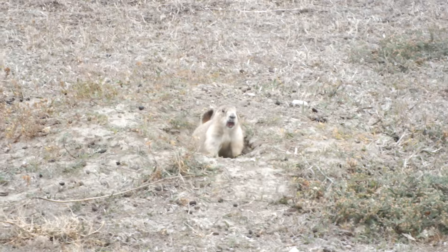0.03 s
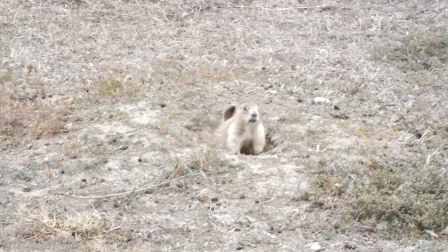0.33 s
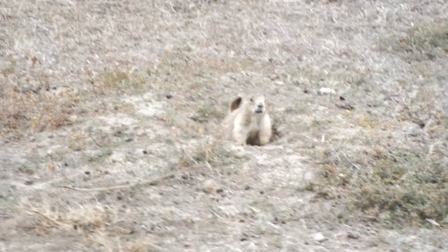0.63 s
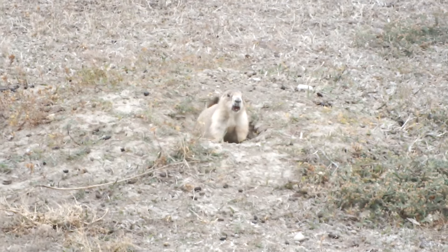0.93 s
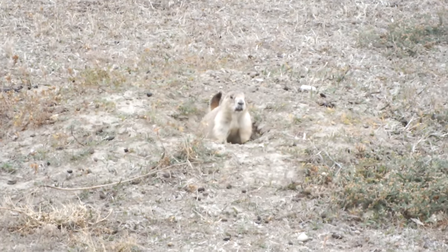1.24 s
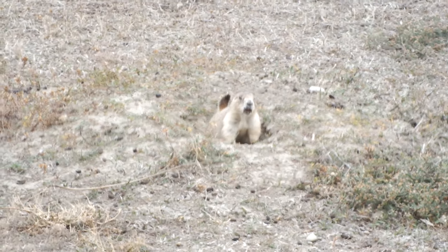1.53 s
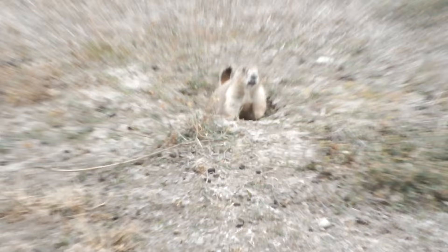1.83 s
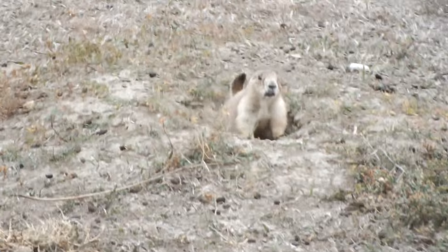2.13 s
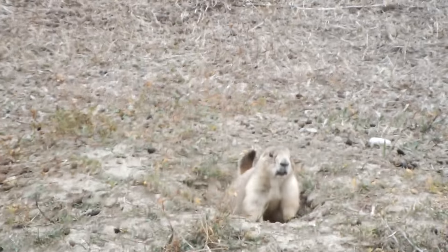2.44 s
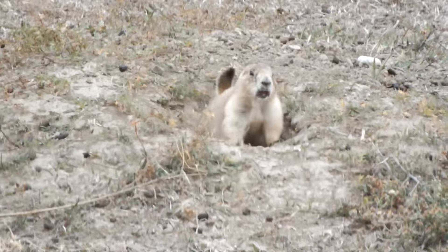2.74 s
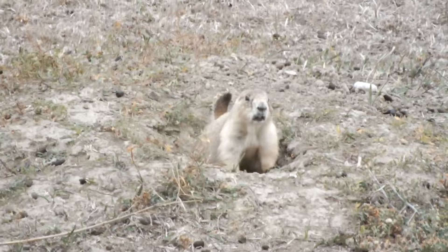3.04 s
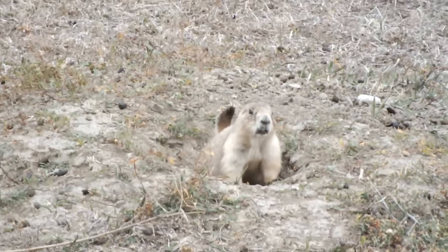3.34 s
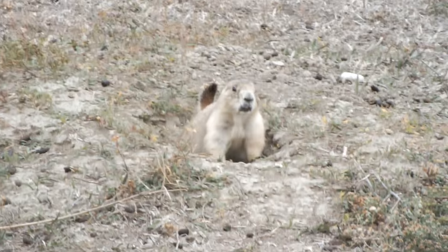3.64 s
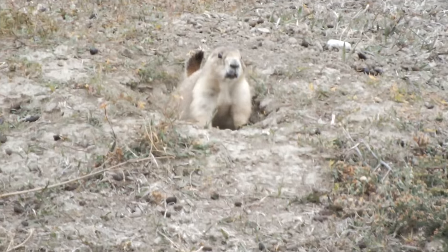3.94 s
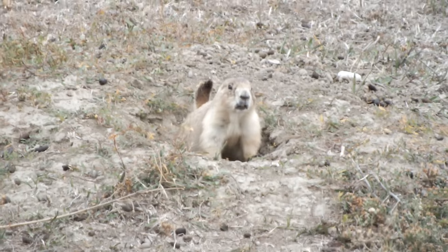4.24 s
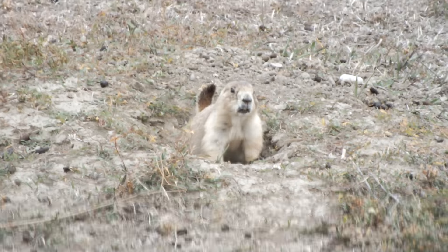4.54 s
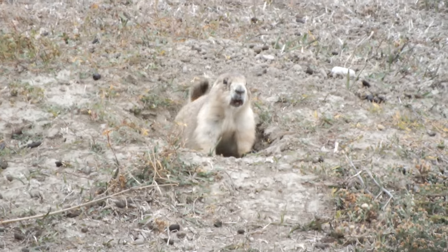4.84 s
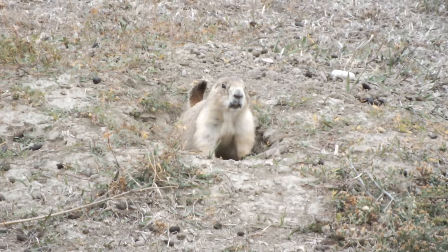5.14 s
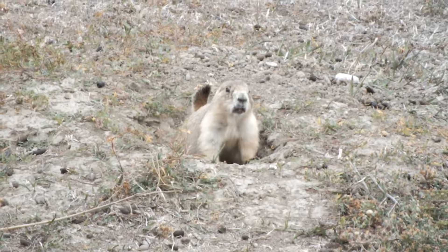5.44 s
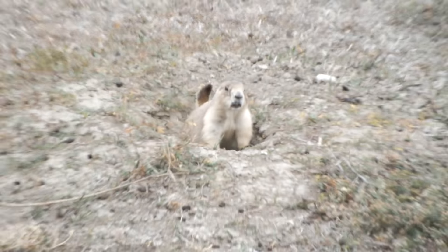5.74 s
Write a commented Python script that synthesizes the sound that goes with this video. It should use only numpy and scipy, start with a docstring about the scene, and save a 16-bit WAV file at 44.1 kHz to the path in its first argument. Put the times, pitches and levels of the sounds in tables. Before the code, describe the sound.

Light wind blows steadily over open grassland, with a faint low hum and a thin trace of insects. A prairie dog a few metres away barks seven times, at about 0.1, 1.0, 1.6, 2.8, 4.1, 4.9 and 5.6 seconds. Each bark is a very short, high squeak that rises and falls in pitch, with a raspy edge and almost no echo. The second is the harshest and cracks into a squeal. Throughout, distant prairie dogs give much quieter, higher yips, mostly from the left. Two tiny, thin whistles sound on the left at about 2.2 and 3.9 seconds. The hand-held camera adds soft rubs and small ticks, mostly between 1.4 and 3.6 seconds, and dull bumps near 1.9, 4.8 and 5.7 seconds. Just after that last bump, its plastic case gives one sharp, close click.

```python
"""A prairie dog barks seven times from its burrow on open ground, a few metres from a hand-held camera.
Each bark is one short arch of pitch from the vocal folds that breaks into a rasp and may drop at its crest.
Neighbours yip far off, over light wind in the grass, a low hum and insects.
The hand bumps and rubs the camera and makes it tick, two thin whistles sound briefly,
and near the end the plastic case gives one sharp click."""
import sys
import numpy as np
from scipy import signal
from scipy.fft import rfft, irfft, next_fast_len
from scipy.io import wavfile
from scipy.ndimage import uniform_filter1d

SR = 44100
rng = np.random.default_rng(int(sys.argv[2]) if len(sys.argv) > 2 else 0)


def store_pcm(level_fs):
    """Save levels as 16-bit WAV."""
    pcm = np.round(np.clip(level_fs, -1, 1) * 32767).astype(np.int16)
    wavfile.write(sys.argv[1], SR, np.atleast_2d(pcm).T)


N = 259308


def amp(db):
    """Decibels to gain."""
    return 10 ** (np.asarray(db) / 20)


def unit(x):
    """Scales to rms 1."""
    return x / np.sqrt(np.mean(x ** 2) + 1e-20)


def curve(points, hz):
    """Reads a table on a log-frequency axis."""
    freqs, values = np.transpose(points)
    return np.interp(np.log(hz + 1), np.log(freqs + 1), values)


def add(mix, start_s, sound):
    """Lays a sound into the mix."""
    part = mix[..., round(start_s * SR):][..., :sound.shape[-1]]
    part += sound[..., :part.shape[-1]]


def colour(x, gain):
    """EQ by a gain that is a function of frequency."""
    size = next_fast_len(x.shape[-1] + 1024)
    return irfft(rfft(x, size) * gain(np.fft.rfftfreq(size, 1 / SR)), size)[..., :x.shape[-1]]


def wobble(size, hz):
    """Smooth random modulation of rms 1, up to about the given rate."""
    return unit(colour(rng.standard_normal(size), lambda f: np.exp(-.5 * (f / hz) ** 2)))


def stereo(a, b, likeness):
    """Two channels of a given likeness from two unrelated noises."""
    return np.array([a, likeness * a + np.sqrt(1 - likeness ** 2) * b])


def ports(x, balance_db, phase_rad):
    """The camera body shades and delays a sound at its two microphone ports."""
    sides = np.array([[1], [-1]])
    return colour(np.atleast_2d(x), lambda f: (amp(balance_db(f) / 2) * np.exp(.5j * phase_rad(f))) ** sides)


# tone of wind over grass: freq_hz, relative_db
WIND_TONE = [(15, -43), (25, -19), (70, -6), (92, -6), (114, -1.5), (145, -12), (354, -2.5), (476, -6),
             (840, -6), (1520, -14.5), (6050, -25.5), (6560, -29.5), (7110, -27.5), (14400, -40),
             (16000, -48)]
# swells of the breeze, each level taken against its median: time_s, roar_db, hiss_db
WIND_SWELLS = [(0.26, -47.5, -60.5), (0.49, -47, -59), (0.87, -46, -61.5), (2.78, -46.5, -57),
               (2.89, -47.5, -59), (5.16, -47.5, -59.5), (5.88, -46, -58.5)]
# stereo width of the wind: freq_hz, likeness_0_to_1
WIND_LIKENESS = [(25, .7), (60, 0.79), (130, 0.82), (290, 0.81), (640, 0.64), (1100, 0.5), (1400, 0.18),
                 (3000, 0.15), (7000, 0.21), (12000, 0.089)]
# wind balance at the ports: freq_hz, left_minus_right_db
WIND_BALANCE = [(25, 2.2), (110, 1.6), (400, 1.2), (950, -2), (1400, -1.5), (2200, 4.5), (3300, 3.5),
                (4800, .8), (7200, 2.5), (12000, 0.5), (15000, -1)]
# wind phase at the ports: freq_hz, left_lead_rad
WIND_PHASE = [(700, 0), (1200, 1.17), (1700, 3), (4000, 6), (7000, 9), (8500, 8.5), (10000, 12.5)]

def wind(level_db=-45.3, patchy_db=1.32, crossover_hz=2000):
    """Wind over the grass: a bed of low roar and hiss that swells slowly, with drifting patches."""
    window, hop = 1024, 256
    t = np.arange(N // hop + 5) * hop / SR
    hz = np.fft.rfftfreq(window, 1 / SR)
    a, b, c, d, patches = rng.standard_normal((5, len(t), len(hz)))
    patches = unit(uniform_filter1d(uniform_filter1d(patches, size=14, axis=0), size=10, axis=1))
    time_s, *swells = np.transpose(WIND_SWELLS)
    roar_db, hiss_db = (np.interp(t, time_s, db - np.median(db))[:, None] for db in swells)
    treble = hz ** 2 / (hz ** 2 + crossover_hz ** 2)
    shape_db = curve(WIND_TONE, hz) + (1 - treble) * roar_db + treble * hiss_db + patchy_db * patches
    spectra = stereo(a + 1j * b, c + 1j * d, curve(WIND_LIKENESS, hz)) * amp(shape_db)
    air = signal.istft(spectra.transpose(0, 2, 1), nperseg=window, noverlap=window - hop)[1][:, :N]
    air = ports(unit(air), lambda f: curve(WIND_BALANCE, f), lambda f: curve(WIND_PHASE, f))
    return amp(level_db) * air


# tones of the low hum: pitch_hz, level_db
HUM_TONES = [(65, -59), (122, -59)]

def hum(waver_rad=.49, waver_hz=3):
    """Two low sines waver slightly, a touch to the left."""
    out, t = np.zeros((2, N)), np.arange(N) / SR
    for hz, db in HUM_TONES:
        drift = waver_rad * hz / HUM_TONES[0][0] * wobble(N, waver_hz)
        out += amp([[db + 1], [db - 1]]) * unit(np.sin(2 * np.pi * hz * t + drift))
    return out


# a low drone, insects in the grass and a thin hiss:
# centre_hz, width_hz, level_db, likeness_0_to_1, flutter_db, left_minus_right_db
DRONE_BANDS = [(233.5, 15, -64.5, 0.8, 1.5, 1), (6584, 480, -68.5, .5, 3.5, -4),
               (14400, 150, -83, .4, 3, -5)]

def drones_and_insects(flutter_hz=5):
    """Narrow bands of noise flutter in level."""
    out = np.zeros((2, N))
    for hz, width_hz, db, likeness, flutter_db, pan_db in DRONE_BANDS:
        band = colour(rng.standard_normal((2, N)), lambda f: 1 / (1 + (2 * (f - hz) / width_hz) ** 2))
        flutter = amp(flutter_db * wobble(N, flutter_hz))
        out += amp([[db + pan_db / 2], [db - pan_db / 2]]) * unit(stereo(*band, likeness) * flutter)
    return out


def resonate(x, gain):
    """Filters like a resonant tube: minimum phase, so every pulse rings on afterwards."""
    size = next_fast_len(len(x) + 2048)
    log_gain = np.log(np.maximum(gain(abs(np.fft.fftfreq(size, 1 / SR))), 1e-3))
    response = np.exp(signal.hilbert(log_gain).conj())
    return np.fft.ifft(np.fft.fft(x, size) * response).real[:len(x)]


def voice(hz, rough, throat, jitter=.083, shimmer=.25, rasp=1.05, flutter_hz=480, slaps_per_s=180):
    """Vocal folds through the throat; when rough, they stumble, leak puffs of air and slap."""
    size = len(hz)
    phase = 2 * np.pi * np.cumsum(hz * (1 + jitter * rough * wobble(size, flutter_hz))) / SR
    folds = unit(sum(np.cos(k * phase) * (k * hz < SR / 2) for k in range(1, 15)))
    puffs = unit((1 + np.cos(phase)) * rng.standard_normal(size))
    slaps = 7 * (rng.random(size) < slaps_per_s / SR)
    grit = colour(rasp * puffs + slaps, lambda f: 1 / np.hypot(1, (f / 12000) ** 2))
    drive = (folds + rough * grit) / np.hypot(1, rasp * rough)
    drive *= np.exp(shimmer * rough * wobble(size, flutter_hz))
    return unit(resonate(drive, lambda f: amp(curve(throat, f)) * (1 - np.exp(-(f / 800) ** 4))))


def bark_pitch(u, top_hz, crest, drop, climb=.1248, climb_bend=2.2, fall=.219, fall_bend=2.11):
    """As u runs 0 to 1, the pitch climbs to a crest, may break to a lower register, and falls away."""
    before = np.maximum(1 - u / crest, 0)
    after = np.maximum((u - crest) / (1 - crest), 0)
    sag = climb * before ** climb_bend + drop * (u > crest) + (fall - drop) * after ** fall_bend
    return top_hz * (1 - uniform_filter1d(sag, size=100, mode="nearest"))


# bark cues: start_s, length_s, level_db, top_pitch_hz, crest_at_fraction, pitch_drop_fraction,
# rasp_delay_s, rasp_length_s, added_roughness_0_to_1
BARK_CUES = [ (0.1182, .046, -27.5, 1250, .38, 0.01, .010, .020, .06),
             (.991, .054, -26, 1299, 0.47, 0.11, 0.0087, 0.037, 0.59),
             (1.631, .052, -27, 1245, .36, 0.01, .014, 0.029, 0.3),
             (2.8489, 0.05, -27, 1252, 0.43, 0, 0.0069, 0.033, .55),
             (4.073, 0.052, -27, 1289, .58, .13, 0.0091, .023, .4),
             (4.887, .049, -27.5, 1228, .48, 0, 0.0016, .016, 0.5),
             (5.5595, 0.051, -27, 1236, 0.48, 0, .010, .022, 0.05)]
# air pressure through a bark: length_fraction, gain_db
BARK_ENVELOPE = [(0, -7), (.1, -3), (.3, -2), (.62, -2.5), (.82, -1.5), (1, -14)]
# formants of throat and mouth: freq_hz, gain_db
BARK_THROAT = [(1150, -14.5), (1900, -5.5), (2450, 3), (3100, -10.5), (3700, 4), (4300, -15.5),
               (5100, -10.5), (6900, -2.8), (7700, -21.5), (9000, -16.5), (10600, -28.5), (11900, -19),
               (14600, -34), (16000, -33)]

def barks(base_roughness=.12):
    """The near prairie dog: one push of air makes a clear arch of pitch with a rasping stretch."""
    out = np.zeros(N)
    for start_s, length_s, db, top_hz, crest, drop, rasp_delay_s, rasp_s, roughness in BARK_CUES:
        u = np.linspace(0, 1, round(length_s * SR))
        rasping = (u * length_s > rasp_delay_s) & (u * length_s < rasp_delay_s + rasp_s)
        rough = base_roughness + roughness * uniform_filter1d(rasping * 1., size=130)
        pressure = amp(np.interp(u, *np.transpose(BARK_ENVELOPE))) * signal.windows.tukey(len(u), .05)
        hz = bark_pitch(u, top_hz, crest, drop)
        add(out, start_s, amp(db) * pressure * voice(hz, rough, BARK_THROAT))
    return out


def open_ground(x, mound_db=-19, mound_t60_s=.081, grass_db=-27, grass_t60_s=.97, dull_hz=5500):
    """Reverb without walls: a brief scatter off the mound, then a faint wash from the grass."""
    t = np.arange(SR // 2) / SR
    def scatter(t60_s):
        taps = rng.standard_normal((2, len(t))) * amp(-60 * t / t60_s) * (t > .003)
        return taps / np.linalg.norm(taps[0])
    tail = amp(mound_db) * scatter(mound_t60_s) + amp(grass_db) * scatter(grass_t60_s)
    wet = signal.fftconvolve(x[None], tail, axes=1)[:, :N]
    return colour(wet, lambda f: 1 / np.hypot(1, (f / dull_hz) ** 2))


# bark balance at the ports: freq_hz, left_minus_right_db
BURROW_BALANCE = [(1200, 3.5), (2400, -2), (3700, 1.5), (5400, -4.5), (6600, 4.5), (8600, 4.5), (11500, 7),
                  (15000, -2)]
# bark phase at the ports: freq_hz, left_lead_rad
BURROW_PHASE = [(1200, -0.48), (2400, 0.7), (3700, -0.68), (5400, 0.55), (6300, 1), (8000, 0), (12000, -.4)]

def from_burrow(x):
    """Places the near voice: the direct sound at the two ports, plus scatter off the ground."""
    direct = ports(x, lambda f: curve(BURROW_BALANCE, f), lambda f: curve(BURROW_PHASE, f))
    return direct + open_ground(x)


# distant yip cues: start_s, length_s, top_pitch_hz, level_db, roughness_0_to_1, leftward_0_to_1
YIP_CUES = [(.398, 0.064, 2080, -50.5, .45, 0.36), (0.492, 0.049, 2290, -51, .2, 0.9),
            (1.135, .056, 2400, -46.5, 0.56, 0.89), (2.149, .04, 1940, -58, .8, 0),
            (2.191, 0.051, 2294, -47, .2, 0.94), (2.637, 0.056, 2260, -46.5, .12, 1),
            (3.215, .051, 2275, -49.5, 0.33, 0.98), (3.827, .034, 1835, -49, 0.1, 0.93),
            (4.17, .053, 2294, -45.5, 0.12, 1), (4.226, .04, 1950, -55.5, .9, 0.1),
            (4.628, .048, 2270, -49.5, .06, 0.97), (4.712, 0.049, 1980, -53.5, 0.76, 0.14),
            (5.092, .049, 2240, -51, 0.13, 1), (5.627, .063, 2230, -51.5, .2, 0.78),
            (5.701, .04, 1960, -54, 0.62, 0)]
# pitch bend of a yip: length_fraction, pitch_ratio
YIP_BEND = [(0, .82), (.13, .92), (.25, 1), (.55, .995), (.85, .965), (1, .82)]
# formants of the neighbours' throats: freq_hz, gain_db
YIP_FORMANTS = [(1800, -2.5), (2400, -4), (3600, 2.5), (4500, 1.5), (5500, -9), (6800, -7), (9000, -12.5),
                (11500, -25), (15000, -39)]
# shading of a call from hard left: freq_hz, left_minus_right_db
YIP_SHADE = [(1800, 0), (2300, 11), (3500, 19.5), (4600, 18.5), (6800, 13), (9000, 10)]

def neighbours(lag_s=.00021):
    """Far, higher yips, loudest midway; most come from the left, shaded and late at the right port."""
    out = np.zeros((2, N))
    for start_s, length_s, top_hz, db, rough, left in YIP_CUES:
        u = np.linspace(0, 1, round(length_s * SR))
        hz = top_hz * uniform_filter1d(np.interp(u, *np.transpose(YIP_BEND)), size=200, mode="nearest")
        swell = np.sqrt(4 * u * (1 - u))
        yip = amp(db) * swell * voice(hz, rough, YIP_FORMANTS, jitter=.077, rasp=.48)
        placed = ports(yip, lambda f: left * curve(YIP_SHADE, f), lambda f: left * 2 * np.pi * f * lag_s)
        add(out, start_s, placed)
    return out


# soft bumps on the camera: start_s, peak_db, pitch_hz, t60_s
BUMP_CUES = [(.485, -44, 75, 0.13), (1.79, -42, 105, 0.09), (1.896, -31.5, 180, 0.041),
             (2.36, -43, 100.5, 0.23), (4.75, -36.5, 160, 0.052), (5.485, -50, 73, 0.17),
             (5.677, -29, 212, .05)]

def bumps():
    """The hand knocks the camera body, which thuds in one low, damped mode."""
    out, t = np.zeros(N), np.arange(SR // 4) / SR
    for start_s, db, hz, t60_s in BUMP_CUES:
        add(out, start_s, amp(db - 60 * t / t60_s) * np.sin(2 * np.pi * hz * t))
    return out


# the voice cracks into a squeal: start_s, length_s, level_db, first_hz, last_hz
SQUEAL_CUES = [(1.001, 0.0172, -29.5, 2540, 3150)]

def squeal(jitter=.046):
    """A second, nearly pure oscillation rises inside the harshest bark."""
    out = np.zeros(N)
    for start_s, length_s, db, first_hz, last_hz in SQUEAL_CUES:
        hz = np.linspace(first_hz, last_hz, round(length_s * SR))
        phase = 2 * np.pi * np.cumsum(hz * (1 + jitter * wobble(len(hz), 400))) / SR
        add(out, start_s, amp(db) * unit(np.sin(phase) * signal.windows.tukey(len(hz), .4)))
    return out


def friction(size, hz, octaves, grain=.35, likeness=.23, right_db=-3):
    """Grainy friction noise around one frequency, at both ports."""
    noise = stereo(*rng.standard_normal((2, size)), likeness) * amp([[0], [right_db]])
    grains = noise * np.exp(grain * wobble(size, 400))
    def band(f):
        bell = np.exp(-.5 * (np.log2((f + 1) / hz) / octaves) ** 2)
        return bell / np.sqrt(f + hz) / np.hypot(1, (f / 11000) ** 2)
    return unit(colour(grains, band))


# finger strokes: start_s, length_s, level_db, centre_hz, width_octaves
RUB_CUES = [(1.371, .06, -51.5, 1490, .6), (1.889, 0.058, -50.5, 4500, 1.3),
            (2.108, .065, -52.5, 4500, 1.3), (2.36, 0.086, -56, 3000, 1.5), (2.53, 0.14, -58, 5000, .6),
            (3.59, .04, -46, 780, 0.48), (4.575, 0.12, -51, 2570, 0.67), (5.671, .04, -48, 3000, 1.2)]

def rubs():
    """Fingers slide over the case; each stroke swells quickly and tapers off."""
    out = np.zeros((2, N))
    for start_s, length_s, db, hz, octaves in RUB_CUES:
        u = np.linspace(0, 1, round(length_s * SR))
        add(out, start_s, amp(db) * unit(friction(len(u), hz, octaves) * np.sqrt(u) * (1 - u)))
    return out


# small ticks of case and lens: start_s, attack_db, t60_s, centre_hz, width_octaves
TICK_CUES = [(1.889, -38, .05, 1690, 1.3), (2.016, -47, 0.035, 6100, .15), (2.277, -35.5, .03, 940, 0.37),
             (2.386, -40, .06, 2400, 1.6), (2.564, -35, 0.038, 800, .5), (2.979, -40.5, .02, 8400, 0.77),
             (3.580, -34, 0.035, 895, 0.47), (5.699, -42, 0.016, 7000, .8), (5.836, -45.5, 0.018, 6200, .3)]

def ticks():
    """The camera ticks under the fingers: bursts of friction that die at once."""
    out, t = np.zeros((2, N)), np.arange(SR // 4) / SR
    for start_s, db, t60_s, hz, octaves in TICK_CUES:
        add(out, start_s, amp(db - 60 * t / t60_s) * friction(len(t), hz, octaves))
    return out


# thin whistles, well to the left: start_s, length_s, pitch_hz, left_db, right_db
WHISTLE_CUES = [(2.238, .039, 3520, -42, -64), (3.865, 0.022, 3000, -51, -68)]

def whistles():
    """A pure tone holds one pitch for a moment and stops."""
    out = np.zeros((2, N))
    for start_s, length_s, hz, left_db, right_db in WHISTLE_CUES:
        t = np.arange(round(length_s * SR)) / SR
        tone = unit(np.sin(2 * np.pi * hz * t) * signal.windows.tukey(len(t), .15))
        add(out, start_s, amp([[left_db], [right_db]]) * tone)
    return out


# modes of the plastic case: freq_hz, level_db, t60_s, delay_s, left_minus_right_db
CASE_MODES = [(507, -29, .011, .0019, -6), (815, -7.5, 0.0093, 0.00085, -6.5), (1470, -17, 0.011, .001, -4),
              (2200, -12.5, 0.0072, 0.0022, -5), (3900, -8, 0.0044, 0.0003, -8.5),
              (6300, -15.3, .004, 0.00031, 6), (7700, -17, .0044, .0064, -8.5), (10360, -23, .0036, 0, 7),
              (14500, -23, .0047, 0, 1)]

def case_click(start_s=5.74, rattle_db=-29, rattle_t60_s=.037, rebound_db=-24, rebound_s=.005):
    """A part of the case snaps home: a tick, a hollow knock, a small rebound and a brief rattle."""
    out, t = np.zeros((2, N)), np.arange(SR // 20) / SR
    age = np.maximum(t - np.array([[.00006], [0]]), 0)  # the right port is nearer
    for hz, db, t60_s, delay_s, pan_db in CASE_MODES:
        pan = amp([[pan_db / 2], [-pan_db / 2]])
        mode = amp(db - 60 * age / t60_s) * np.sin(2 * np.pi * hz * age) * pan
        add(out, start_s + delay_s, mode)
        add(out, start_s + delay_s + rebound_s, amp(rebound_db) * mode)
    rattle = unit(colour(rng.standard_normal((2, len(t))), lambda f: 1 / np.hypot(1, f / 3000)))
    add(out, start_s, rattle * amp(rattle_db - 60 * t / rattle_t60_s))
    return signal.lfilter(*signal.butter(2, 330, "high", fs=SR), out)  # a small case radiates no bass


def scene():
    """Barks up front, a wetter colony behind, the outdoor bed, whistles and handling noise."""
    near, far = barks() + squeal(), neighbours()
    burrow = from_burrow(near)
    colony = far + open_ground(far.mean(0), mound_db=-10, grass_db=-18)
    bed = wind() + hum() + drones_and_insects()
    handling = bumps() + rubs() + ticks() + case_click()
    return burrow + colony + bed + whistles() + handling


def record(dry, open_s=.078, fade_s=.004, cutoff_hz=16000):
    """The camera opens its input after a moment and cuts the highest treble."""
    fade_in = np.clip((np.arange(N) / SR - open_s) / fade_s, 0, 1)
    lowpass = signal.firwin(255, cutoff_hz, window=("kaiser", 8), fs=SR)
    return signal.oaconvolve(dry * fade_in, lowpass[None], "same")


dry = scene()
out = record(dry)
store_pcm(out)
```